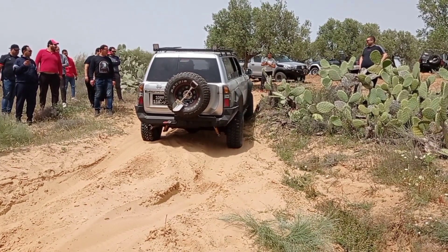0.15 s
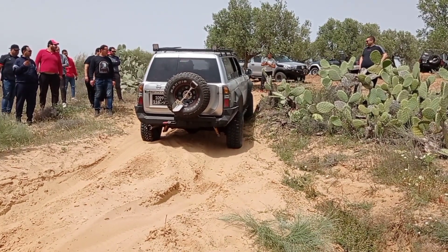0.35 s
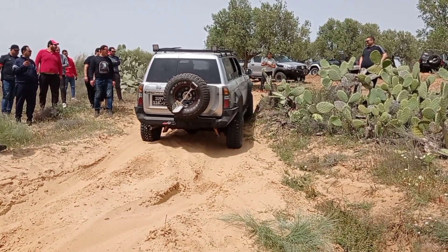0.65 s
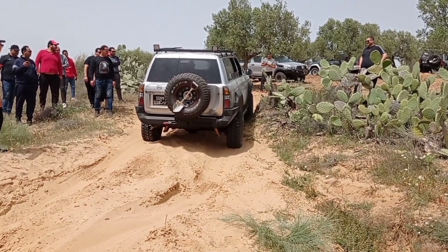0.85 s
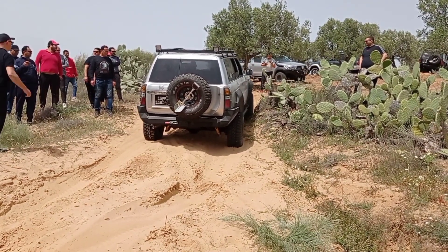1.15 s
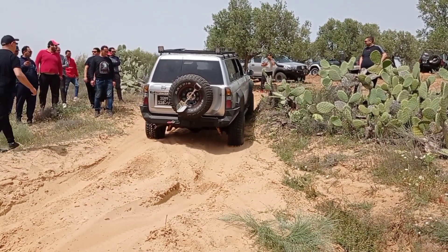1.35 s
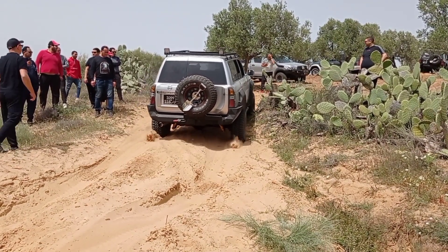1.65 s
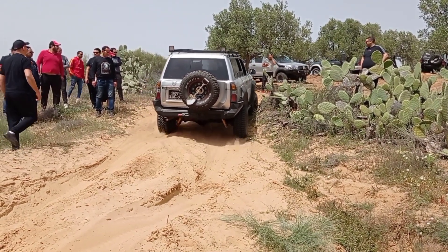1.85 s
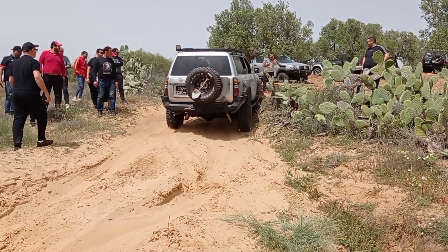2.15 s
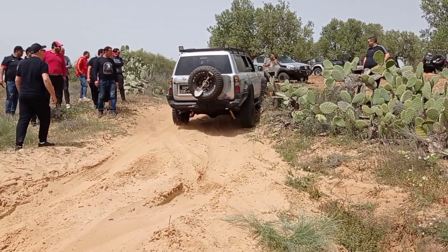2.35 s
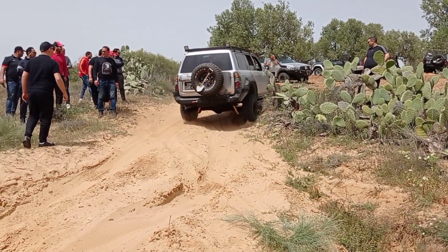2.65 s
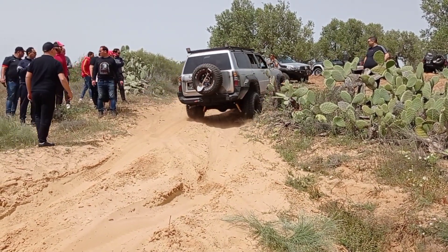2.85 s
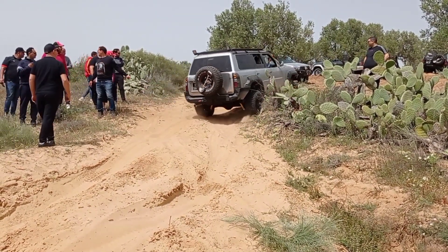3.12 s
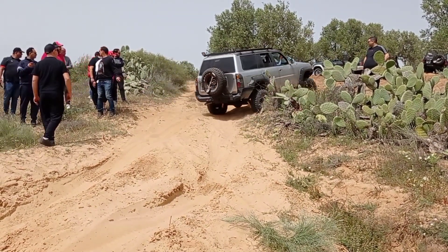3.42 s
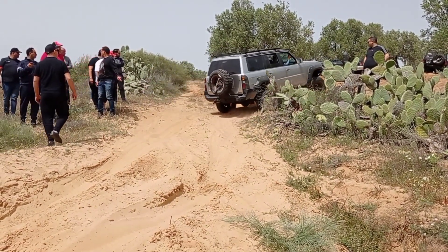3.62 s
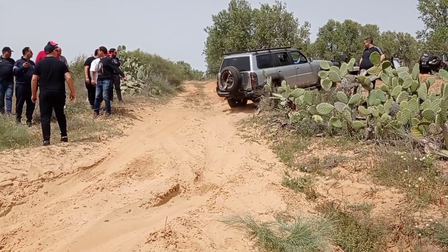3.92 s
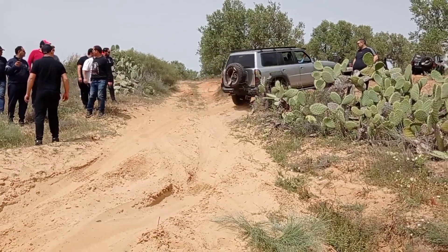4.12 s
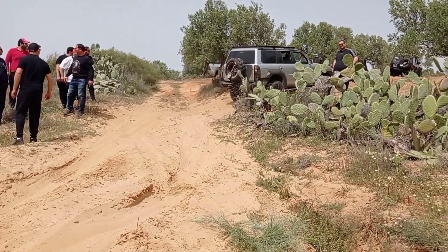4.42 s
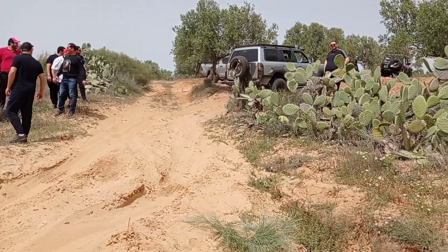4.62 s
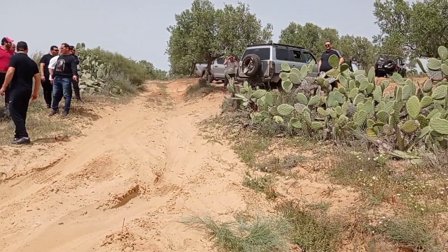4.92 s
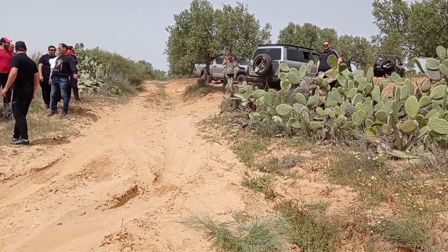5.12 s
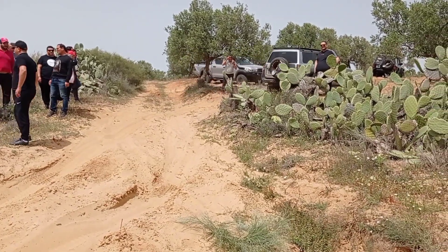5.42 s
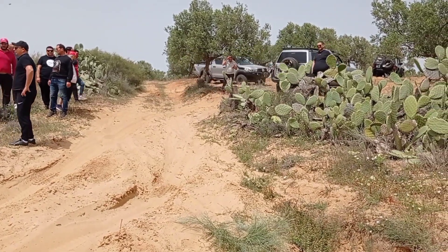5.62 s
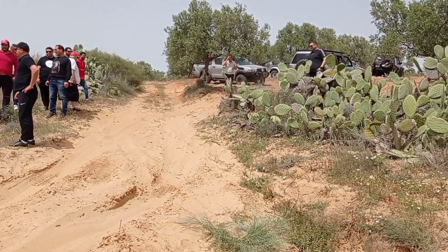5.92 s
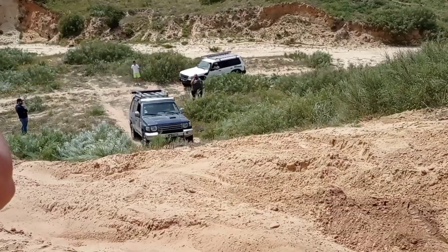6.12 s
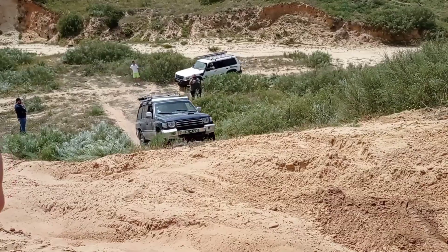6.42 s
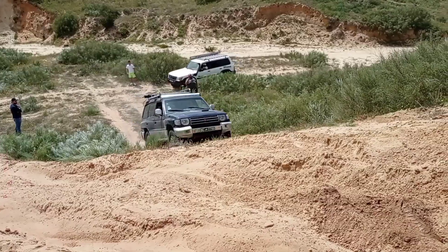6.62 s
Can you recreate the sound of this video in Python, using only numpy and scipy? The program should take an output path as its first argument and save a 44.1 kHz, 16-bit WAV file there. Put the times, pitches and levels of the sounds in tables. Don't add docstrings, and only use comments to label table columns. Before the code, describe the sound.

Loud, throaty four-wheel-drive growl surging and sagging through sand, wind thumping the microphone, dropping away before another engine picks up revs.

```python
import sys
import numpy as np
from scipy import signal
from scipy.fft import rfft, irfft
from scipy.io import wavfile
from scipy.ndimage import uniform_filter1d, map_coordinates

SR = 44100
rng = np.random.default_rng(int(sys.argv[2]) if len(sys.argv) > 2 else 0)


def generate_wav(sig):
    pcm = np.round(np.clip(np.atleast_2d(sig).T, -1, 1) * 32767).astype(np.int16)
    wavfile.write(sys.argv[1], SR, pcm)


def ratio(d):
    e = np.asarray(d, float) / 20
    return 10 ** e


N = 298116

# t/s, side (0 rear, 1 flank, 2 hidden, 3 gone or front)
VIEW_SIDE = [(0, -0.5), (1.9, 0), (2.3, 1.15), (3.7, 2.05), (5.35, 2), (5.8, 3), (6.76, 3.5)]
# t/s, upper-order gain/dB
FACING_GAIN = [(0, -2), (.5, 2.5), (1.2, -2), (2.0, -0.5), (2.35, 2), (2.55, 5), (2.75, 10.5), (3.05, 3.5),
               (3.5, 7), (3.85, 11), (4.2, 11), (4.69, 9.5), (4.78, -5.5), (5.05, 4), (5.4, -2.5),
               (6.4, -3), (6.76, -2)]
# t/s, firing tone level/dB
CLIMBER_THROTTLE = [(0.0, -18), (0.46, -15), (0.72, -21.5), (1.15, -18.5), (1.36, -25.5), (1.57, -19.5),
                    (2.35, -15.5), (2.51, -20.5), (3.01, -18.5), (3.27, -20), (3.39, -16), (4.16, -20.5),
                    (4.31, -16), (4.61, -16), (4.74, -22), (5.0, -23.5), (5.24, -18.5), (5.75, -37.5)]
# t/s, firing tone level/dB
FOLLOWER_THROTTLE = [
    (5.8, -49),
    (6.1, -44),
    (6.43, -35),
    (6.49, -22.5),
    (6.66, -15.5),
    (6.76, -15.5),
]
# f/Hz, level/dB per Hz
FRONT_HISS = [(2530, -28), (4000, -10), (4700, -11), (5600, -4.5), (7200, 0.5), (8800, -8.5),
              (10800, -19.5), (12500, -32), (16200, -65), (22000, -120)]
FULL_THROTTLE_DB = -15


def unit(x):
    return x / np.sqrt(np.mean(x ** 2) + 1e-20)


def along(points, hz):
    f, v = np.transpose(points)
    return np.interp(np.log(hz + 1), np.log(f + 1), v)


def curves(rows, t=None):
    s, *cols = np.transpose(rows)
    at = np.arange(N) / SR if t is None else t
    return [np.interp(at, s, c) for c in cols]


def eased(points):
    s, v = np.transpose(points)
    step = np.diff(v) / np.diff(s)
    same_way = step[1:] * step[:-1] > 0
    slope = np.pad(np.where(same_way, (step[1:] + step[:-1]) / 2, 0), 1)
    place = np.interp(np.arange(N) / SR, s, np.arange(len(s)) * (1 - 1e-9))
    k, u = place.astype(int), place % 1
    bend = u * (1 - u) * ((1 - u) * slope[k] - u * slope[k + 1]) * np.diff(s)[k]
    return v[k] + u * u * (3 - 2 * u) * np.diff(v)[k] + bend


def wobble(rate_hz):
    knots = rng.standard_normal(int(N * rate_hz / SR) + 4)
    return map_coordinates(knots, [np.arange(N) * rate_hz / SR])


def rush(shape_db, patchy_db, wide=8, long=5):
    hz, t, z = signal.stft(rng.standard_normal(N), SR, nperseg=1024)
    field = uniform_filter1d(rng.standard_normal(z.shape), wide, 0)
    field = uniform_filter1d(field, long, 1)
    gain = ratio(shape_db(hz[:, None], t)) * np.ones(z.shape)
    gain = gain / np.sqrt(np.mean(gain ** 2, axis=0))
    patches = ratio(patchy_db * unit(field))
    return unit(signal.istft(z * gain * patches, SR, nperseg=1024)[1][:N])


def still(points):
    return lambda hz, t: along(points, hz)


def speed_shifts():
    shift_rows = [(.42, .06, -.9), (.73, .1, 1.3), (1.02, .05, 1.1), (1.25, .15, -1.1), (1.63, .15, 2.6),
                  (2.23, .08, -1.4), (2.81, .08, -1.4), (3.17, .07, -1.6), (3.42, .09, -1.3),
                  (4.02, .06, -.8), (5.5, .1, -.9), (6.68, .05, 1.3)]
    t = np.arange(N) / SR
    return sum(hz * np.exp(-((t - s) / half) ** 2) for s, half, hz in shift_rows)


def order_swell_db(k):
    # t mid/s, half length/s, multiple, gain/dB
    order_gain_rows = [(.05, 0.11, 5, 5.5), (0.25, .15, 3, 3), (0.51, 0.061, 5, 9.5), (0.54, 0.086, 6, 10),
                       (0.79, 0.18, 5, 10.5), (1.08, .1, 6, 5.5), (1.28, 0.042, 6, 8), (1.76, .12, 6, 10),
                       (2.29, 0.21, 6, 11), (2.32, 0.14, 5, 4.5), (1.29, 0.18, 3, 4.5), (2.056, 0.12, 7, 10),
                       (.22, .25, 4, 0.5), (2.03, 0.16, 4, 3), (4.6, .25, 8, -5), (2.4, .18, 4.5, 16),
                       (4.9, .12, 5, -8), (4.93, .15, 8, -13), (.35, .2, 3, 1), (0.92, .12, 5, 2.5),
                       (.15, .12, 6, 3), (1.15, 0.24, 5, 3), (4.84, .08, 4, 3), (5.3, 0.11, 6, -7),
                       (6.5, .12, 3, -2), (3.23, 0.19, 8, 4.5), (4.17, .12, 8, 4.5), (6.62, 0.11, 5, 3),
                       (6.65, .08, 7, 7), (2.68, 0.08, 5, 8), (3.12, 0.55, 3, 4.5), (3, 0.19, 5, 9),
                       (3.07, 0.22, 6, 10), (3.8, 0.088, 6, 2.5), (3.844, .12, 4, 9.5), (4.05, 0.16, 3, 5),
                       (4.04, 0.39, 6, 5), (4.46, 0.23, 4, 3.5), (4.607, 0.12, 6, 10.5), (5.62, 0.18, 4, 15),
                       (5.05, .13, 4, 8), (4.5, .2, 3, 1), (5.18, .12, 5, 4.5), (5.15, .12, 6, 6),
                       (6.493, 0.12, 4, 5), (6.7, 0.082, 3, 4.5),
                       (.2, .25, 2.5, 12), (.3, .2, 1, 6), (.06, 0.055, 4, 6), (.42, .1, 8, 7),
                  (.42, .08, 9, 12), (.8, 0.14, 3, 3), (2.1, .06, 3, 5.5), (2.58, .06, 7, 6),
                  (2.91, .09, 5.5, 20), (2.8, .18, 10, 7), (3.42, .08, 6, 9), (3.42, .07, 10, 13),
                  (3.68, .06, 6, 5), (4.27, 0.071, 5, 4), (4.98, .06, 6, 5.5), (5.15, 0.13, 3, 4),
                  (5.2, .1, 7, 12), (5.22, .08, 1, 9), (2.22, .2, 8, 6), (4.57, 0.14, 8, 8),
                  (.62, .3, 4, -4), (1.85, .15, 5, -4), (2.33, .2, 4, -7), (2.58, 0.056, 5, -5),
                  (2.85, 0.11, 5, -9), (3.0, .12, 4, -7.5), (3.85, .12, 5, -12), (5.33, .25, 8, -8),
                  (5.42, .12, 9, -8), (5.42, .12, 10, -8), (4.32, .12, 7, -8), (6.6, 0.11, 5, -6)]
    t = np.arange(N) / SR
    return sum(db * np.exp(-((t - s) / half) ** 4)
               for s, half, order, db in order_gain_rows if round(2 * order) == round(2 * k))


def exhaust(speed, effort, orders, jitter, unsteady_db, lag_rad):
    # multiple of crankshaft speed, level re order 3/dB
    minor_orders = [(1, -1.5), (1.5, -22.5), (2.5, -11), (3.5, -19), (4.5, -27), (5.5, -23), (6.5, -26),
                    (7, -11), (7.5, -26), (8, -8), (8.5, -24), (9, -14.5), (10, -10.5)]
    # f/Hz, gain/dB
    pipe_gain = [(40, -13), (70, -2), (400, -2), (580, 1.5), (680, -11), (1000, -21)]
    shaft_hz = eased(speed)
    firing_db, = curves(effort)
    facing_db, = curves(FACING_GAIN)
    turn = 2 * np.pi * np.cumsum((shaft_hz + speed_shifts()) * (1 + jitter * wobble(25))) / SR

    t = np.arange(N) / SR
    start_s, end_s = effort[0][0], speed[-1][0]
    fade_in = np.clip((t - start_s) / .02 + (start_s == 0), 0, 1)
    heard = fade_in * np.clip((end_s + .03 - t) / .01, 0, 1)

    beat = np.sin(2 * turn)
    out = ratio(firing_db + 3.5 + 0.27 * wobble(30)) * beat
    levels_db = [db + share * (firing_db - FULL_THROTTLE_DB) + aimed * facing_db
                 for _, db, share, aimed in orders]
    for k, db in zip((3, 4, 5, 6), levels_db):
        flicker_db = unsteady_db * (0.42 * wobble(6) + 0.05 * k * wobble(20))
        level = ratio(db + 3 + order_swell_db(k) + flicker_db)
        out = out + level * np.sin(k * turn + lag_rad + .045 * k * wobble(12))

    effort_db = uniform_filter1d(levels_db[0], SR // 3)
    smear_rad = .05
    for k, db in minor_orders:
        piped_db = db + order_swell_db(k) + along(pipe_gain, k * shaft_hz)
        level = ratio(effort_db + piped_db + unsteady_db * wobble(7))
        out = out + level * np.sin(k * turn + smear_rad * k * wobble(16))
    return heard * out, heard * beat


def climber():
    # t/s, crankshaft speed/Hz
    climb_speed = [(0, 86), (.29, 92.6), (.62, 86.37), (1.03, 90.8), (1.52, 84.93), (2.09, 80.15),
                   (2.33, 85.22), (2.66, 74.45), (2.97, 79.24), (3.24, 73.7), (3.53, 77.3), (3.83, 65.87),
                   (4.2, 75.96), (4.53, 65.7), (4.71, 67.26), (5.0, 60.17), (5.33, 65.05), (5.8, 43.1)]
    # multiple, full-throttle level/dB, share of throttle swing, share of facing gain
    climb_orders = [(3, -35.5, 0.61, 0.19), (4, -43, 0.55, 1.2), (5, -46, 0.43, .1), (6, -48, 0.58, 0.43)]
    return exhaust(climb_speed, CLIMBER_THROTTLE, climb_orders, jitter=0.004, unsteady_db=3.5, lag_rad=0.05)


def echoes(hz, t):
    echo_rows = [(0, 1.3, 2170, 2200, -6), (0, 1.9, 1000, 1100, -4), (1.8, 2.25, 1050, 850, -6),
                 (2.05, 2.8, 1880, 1560, -3.5), (1.95, 2.5, 1620, 1220, -3), (2.15, 2.5, 2050, 1930, -4),
                 (0, .9, 2950, 3100, -4), (.2, 1.4, 3250, 3650, 1.5), (5.5, 6.45, 2800, 2500, -5),
                 (5.6, 6.05, 1000, 950, -6), (3.2, 4.7, 1900, 1900, -4), (0, .9, 1630, 1650, -7),
                 (1.3, 1.85, 1740, 1760, -6), (0, .35, 4100, 4000, -3)]
    width_hz = 90
    gain_db = 0
    for start_s, end_s, from_hz, to_hz, db in echo_rows:
        share = np.clip((t - start_s) / (end_s - start_s), 0, 1)
        centre_hz = from_hz + share * (to_hz - from_hz)
        swell = np.sqrt(abs(np.sin(np.pi * share)))
        gain_db = gain_db + db * swell * np.exp(-((hz - centre_hz) / width_hz) ** 2)
    return gain_db


def roar_colour(hz, t):
    # f/Hz, level/dB per Hz
    rear = [(410, -37), (700, -3.5), (839, -5.5), (1030, -11.5), (1440, 1), (1530, -4), (1640, -7.5),
            (1920, -4), (2140, -8), (2410, -2.5), (3030, -3.5), (3480, 1), (4600, -21.5), (5980, -45),
            (10100, -120)]
    # f/Hz, level/dB per Hz
    flank = [(410, -16), (700, -20), (763, -4), (1220, -5), (1340, -4), (1480, -8.5), (1840, -5.5),
             (2010, -4.5), (2190, -7.5), (2390, -0.5), (2610, -10), (3280, -6.5), (4600, -18.5),
             (5980, -51), (10100, -120)]
    # f/Hz, level/dB per Hz
    hidden = [(410, -14), (700, -11), (757, -11), (908, -8.5), (1150, -9), (1300, -7), (2190, -15),
              (3380, -10.5), (4600, -22), (5980, -52), (10100, -120)]
    # t/s, f/Hz, depth/dB
    sand_notch = [(0, 1620, 13), (1.1, 1660, 19), (1.5, 1780, 22), (1.95, 1860, 8), (2.3, 1845, 9),
                  (2.6, 1880, 3), (2.85, 1850, 1.5), (6.76, 1850, 1)]
    view, = curves(VIEW_SIDE, t)
    notch_hz, depth_db = curves(sand_notch, t)
    sides_db = sum(np.clip(1 - abs(np.minimum(view, 2) - k), 0, 1) * along(side, hz)
                   for k, side in enumerate((rear, flank, hidden)))
    return sides_db + echoes(hz, t) - depth_db * np.exp(-((hz - notch_hz) / 55) ** 2)


def hiss_colour(hz, t):
    # f/Hz, level/dB per Hz
    near_hiss = [(2530, -5), (4300, -8.5), (4720, -1), (5370, -1.5), (6080, 0), (7440, -1.5),
                 (10600, -12.5), (12600, -22.5), (13500, -33), (14000, -24)]
    # f/Hz, level/dB per Hz
    far_hiss = [(2530, -28), (4300, -4), (5120, -4.5), (6090, 0.5), (7650, -4.5), (9480, -15),
                (10800, -18.5), (12500, -26), (16200, -60), (22000, -120)]
    # f/Hz, width/Hz, depth/dB, t end/s
    body_shade = (4440, 650, 13, 1.1)
    view, = curves(VIEW_SIDE, t)
    shade_hz, width_hz, depth_db, until_s = body_shade
    shade_db = np.clip(1 - t / until_s, 0, 1) * depth_db * np.exp(-((hz - shade_hz) / width_hz) ** 2)
    hiss_db = sum(np.clip(1 - abs(np.clip(view, 1, 3) - k), 0, 1) * along(hiss, hz)
                  for k, hiss in enumerate((near_hiss, far_hiss, FRONT_HISS), 1))
    return hiss_db - shade_db


def bay_levels():
    # t/s, block roar level/dB, clear-view gain/dB
    nearness = [(0, -34.5, -2), (.43, -32, -2), (1.0, -36, 1), (1.33, -40, 1.5), (1.52, -35.5, 2),
                (2.0, -36.5, 1.5), (2.27, -32, 2), (2.5, -36.5, 0.5), (2.95, -31, 1), (3.16, -32, 1.5),
                (3.5, -31.5, 2), (3.8, -38, 1.5), (4.1, -36, 0.5), (4.95, -45, -1.5), (5.22, -44, -0.5),
                (5.62, -53.5, -2.5), (6.0, -52, -5), (6.4, -51.5, -5.5), (6.68, -43, 0)]
    # usual level/dB, share of roar swing, share of clear view, share of facing gain
    rasp_law = (-34.7, 0.37, 0, -0.33)
    # same columns, level/dB then shares
    hiss_law = (-43, 1.02, 0.82, 0.05)
    # same columns, level/dB then shares
    sizzle_law = (-65, 1.5, 2.0, 0.36)
    usual_roar_db = -35
    roar_db, clear_db = curves(nearness)
    facing_db, = curves(FACING_GAIN)
    rasp_db, hiss_db, sizzle_db = (db + near * (roar_db - usual_roar_db) + clear * clear_db + aimed * facing_db
                                   for db, near, clear, aimed in (rasp_law, hiss_law, sizzle_law))
    throttle_db, = curves(CLIMBER_THROTTLE + FOLLOWER_THROTTLE)
    return rasp_db + 0.21 * (throttle_db - FULL_THROTTLE_DB), roar_db, hiss_db, sizzle_db


def bay(beat, near_beat):
    # f/Hz, level/dB per Hz
    rasp_colour = [(60, -37), (120, 7.5), (250, -8), (450, -3.5), (700, -13), (1100, -24), (2000, -65),
                   (4000, -120)]
    # f/Hz, level/dB per Hz
    sizzle_colour = [(8120, -43.5), (13800, -12), (14400, -3), (14900, 9), (15600, -15)]
    rasp_db, roar_db, hiss_db, sizzle_db = bay_levels()
    load = wobble(9)
    throb = 1 + .12 * beat + .17 * near_beat
    rasp_throb = 1 + 0.13 * (beat + near_beat)
    rasp = ratio(rasp_db + 2 + 1.56 * wobble(14)) * rasp_throb * rush(still(rasp_colour), patchy_db=2.0)
    streaky = rush(roar_colour, patchy_db=1.7, wide=2, long=16)
    roar = ratio(roar_db + 0.44 * load) * throb * streaky
    hiss = ratio(hiss_db + 0.41 * load + 0.16 * wobble(30)) * throb * rush(hiss_colour, patchy_db=1.5)
    sizzle = ratio(sizzle_db + .7 * load + .8 * wobble(25)) * rush(still(sizzle_colour), patchy_db=2.0)
    return rasp + roar + hiss + sizzle


def panels():
    panel_rows = [(.0, 0.58, 1470, -47), (.7, 1.08, 1490, -47), (1.6, 1.99, 1435, -45.5),
                  (2, 2.25, 1016, -42.5), (2.22, 2.34, 1350, -42), (2.42, 2.76, 1335, -39),
                  (2.82, 3.094, 1320, -36), (2.84, 3.02, 1560, -39), (2.88, 3.05, 1950, -39.5),
                  (3.22, 3.32, 1990, -42), (3.24, 3.34, 1700, -42), (2.2, 2.4, 2400, -45.5),
                  (2.3, 2.48, 2110, -42.5), (.7, .95, 3400, -44.5), (.2, .45, 2450, -44.5),
                  (2.85, 3.08, 1150, -41), (3.2, 3.32, 1490, -43), (3.25, 3.4, 1390, -42),
                  (3.4, 3.62, 1308, -40), (3.38, 3.66, 1650, -42), (3.38, 3.53, 755, -42),
                  (1.96, 2.32, 565, -40), (1.98, 2.2, 455, -42), (4.42, 4.75, 585, -43),
                  (3.4, 3.58, 960, -43), (2.9, 3.1, 870, -45), (2.58, 2.76, 398, -41),
                  (2.7, 2.95, 450, -42), (5.12, 5.34, 435, -44), (5.62, 5.78, 3170, -60)]
    chatter_hz = 27
    t = np.arange(N) / SR
    out = np.zeros(N)
    for start_s, end_s, hz, db in panel_rows:
        swell = np.sin(np.pi * np.clip((t - start_s) / (end_s - start_s), 0, 1)) ** 0.41
        tone = np.sin(2 * np.pi * hz * t + 1.2 * wobble(40))
        chatter = 1 + .5 * np.sin(2 * np.pi * chatter_hz * t + hz)
        out += ratio(db + 1 + 2.8 * wobble(18)) * swell * tone * chatter
    return out


def gusts():
    gust_rows = [(0, .05, -33), (.4, 0.24, -29), (.86, 0.17, -27.5), (1.25, 0.069, -36), (1.55, 0.26, -31),
                 (2.107, 0.026, -30), (2.38, 0.11, -31.5), (2.63, 0.048, -29.5), (2.823, 0.046, -34),
                 (3.02, 0.073, -38), (3.65, 0.12, -40), (4.27, .2, -36), (5.1, .4, -47), (5.55, 0.17, -45),
                 (5.948, 0.22, -46.5), (6.21, 0.082, -27)]
    calm_db = -46
    t = np.arange(N) / SR
    blown = sum(ratio(db) * np.exp(-((t - s) / half) ** 2) for s, half, db in gust_rows)
    return 20 * np.log10(ratio(calm_db) + blown)


def ringing(hz, centre_hz, width_hz):
    return 1j * hz * width_hz / (centre_hz ** 2 - hz ** 2 + 1j * hz * width_hz)


def wind():
    # f/Hz, level/dB per Hz
    buffet_colour = [(20, -42), (48, -41), (70, 0), (105, -4), (160, -1), (240, -2.5), (500, -36),
                     (1000, -66), (2000, -120)]
    # t/s, thud peak level/dB, crackle peak level/dB, thud f/Hz
    pop_rows = [(0.46, -16, -36, 350), (0.523, -20, -36, 250), (0.574, -13, -30, 320),
                (0.58, -12.5, -23, 500), (0.596, -13, -30, 330), (0.828, -21, -29, 300),
                (0.881, -15, -32, 380), (0.932, -16, -40, 340), (1.02, -28, -40, 380),
                (1.405, -17.5, -30, 250), (1.499, -18, -28, 400), (1.616, -23, -26, 400),
                (1.641, -22.5, -29, 350), (2.401, -20, -30, 430), (5.377, -27, -36, 400),
                (5.785, -22, -45, 150), (5.806, -14.5, -28, 231), (6.078, -22, -28, 400),
                (6.087, -21, -36, 220), (6.102, -19, -31, 380), (6.108, -20, -40, 300),
                (6.115, -24, -29, 400), (6.123, -22, -16.5, 520), (6.133, -24, -36, 350),
                (6.167, -23, -21.5, 400), (6.187, -15, -21.5, 420), (6.196, -20, -28, 350),
                (6.206, -12, -27, 240), (6.217, -18.5, -29, 400), (6.233, -16.5, -34, 230),
                (6.249, -23, -26.5, 550), (6.255, -19, -40, 170), (6.264, -22, -36, 380),
                (6.284, -21.5, -45, 250), (6.445, -26, -45, 350), (6.467, -31, -29, 600),
                (6.545, -29, -30, 450), (6.59, -28, -35, 500), (6.624, -19, -40, 420),
                (6.641, -21, -28, 480)]
    buffet_db = gusts()
    pops = np.zeros(N + SR)
    t = np.arange(2048) / SR
    hz = np.fft.rfftfreq(2048, 1 / SR)
    bright = ringing(hz, 600, 620) ** 4
    for s, thud_db, crackle_db, thud_hz in pop_rows:
        dull = ringing(hz, thud_hz, 1.3 * thud_hz) ** 3
        eddy = rng.standard_normal(2048) * (1 - np.exp(-t / .001)) * np.exp(-t / .0035)
        push = eddy + 5.1 * rng.choice([-1, 1]) * (t < .0012)
        snap = eddy + 1.1 * (t < .0006)
        for db, burst, colour in ((thud_db - .5, push, dull), (crackle_db - 2.0, snap, bright)):
            part = irfft(rfft(burst) * colour, 2048)
            pops[round(s * SR):][:2048] += ratio(db) * part / abs(part).max()
    lumps = ratio(0.52 * wobble(24))
    buffet = unit(lumps * rush(still(buffet_colour), patchy_db=1.0))
    return pops[:N] + ratio(buffet_db + 1.5) * buffet


def air():
    # f/Hz, level/dB per Hz
    air_colour = [(11000, -40), (12800, -3), (13800, 0), (15200, 4), (15700, -10)]
    return ratio(-95) * rush(still(air_colour), patchy_db=2.5)


def ticks():
    # t/s, peak level/dB
    tick_rows = [(0.4894, -29), (0.4994, -30), (0.509, -36), (5.255, -44), (5.64, -50), (6.4712, -42),
                 (6.4824, -45), (6.5031, -43), (6.546, -39.5), (6.576, -41.5), (6.5864, -42),
                 (6.5956, -37.5), (6.6514, -45), (6.6752, -41), (6.6944, -45), (6.702, -36), (6.726, -38)]
    gate = np.zeros(N + SR)
    t = np.arange(512) / SR
    for s, db in tick_rows:
        gate[round(s * SR):][:512] += ratio(db - 4.0) * (1 - np.exp(-t / .0004)) * np.exp(-t / 0.0029)
    return gate[:N] * rush(still(FRONT_HISS), patchy_db=3.0)


def squeak():
    # (multiple, level/dB)
    chirp = (2.749, 2930, .008, [(1, -31), (2, -33), (3, -45), (4, -58), (5, -56)])
    mid_s, hz, half_s, partials = chirp
    t = np.arange(N) / SR - mid_s
    turn = 2 * np.pi * hz * t + .35 * wobble(150)
    return np.exp(-(t / half_s) ** 2) * sum(ratio(db) * np.sin(k * turn) for k, db in partials)


def follower():
    # t/s, crankshaft speed/Hz
    follow_speed = [
        (5.75, 42.5),
        (6.1, 36.5),
        (6.26, 36.5),
        (7.0, 72),
    ]
    # multiple, full-throttle level/dB, share of throttle swing, share of facing gain
    follow_orders = [(3, -34, 0.41, 0), (4, -29, .05, 0), (5, -40.5, 0.38, 0.0032), (6, -39, 0.45, 0)]
    return exhaust(follow_speed, FOLLOWER_THROTTLE, follow_orders, jitter=0.0049, unsteady_db=1.5, lag_rad=-0.88)


def scene():
    first, first_beat = climber()
    second, second_beat = follower()
    vehicles = first + second + bay(first_beat, second_beat) + panels() + ticks() + squeak()
    return (vehicles + wind() + air())[None]


def band_limit(x):
    return signal.sosfilt(signal.butter(12, 16860, fs=SR, output="sos"), x)


def record(dry):
    size = N + 8192 - N % 2
    hz = np.fft.rfftfreq(size, 1 / SR)
    band = (hz < 15510) / (1 + (36 / (hz + 1)) ** 2)
    mix = irfft(rfft(dry, size) * band)[:, :N]
    return band_limit(mix)


dry = scene()
out = record(dry)
generate_wav(out)
```